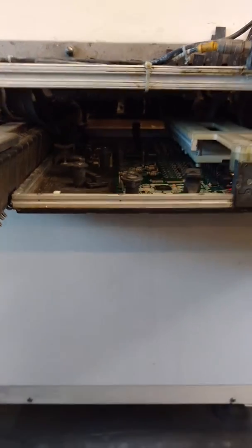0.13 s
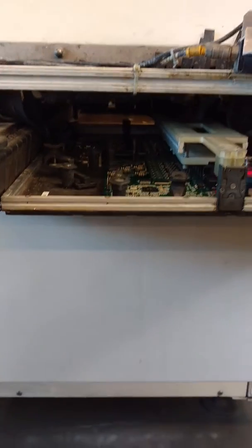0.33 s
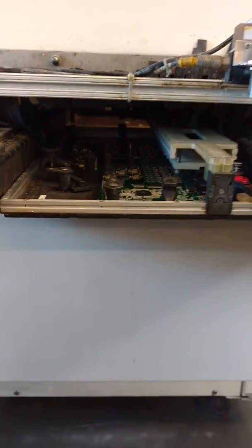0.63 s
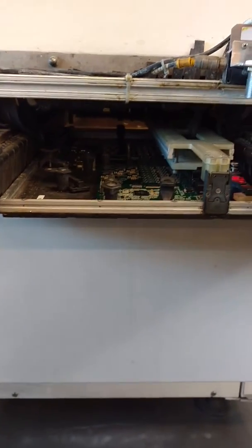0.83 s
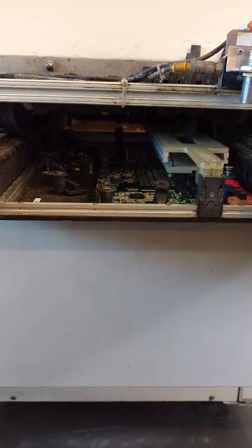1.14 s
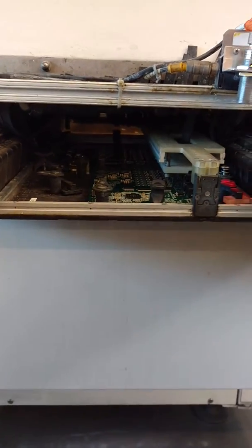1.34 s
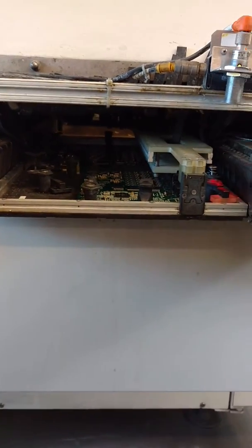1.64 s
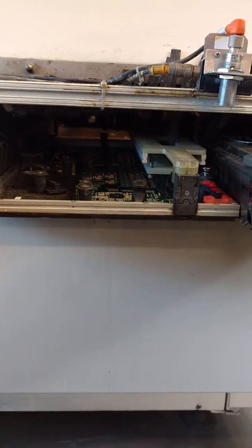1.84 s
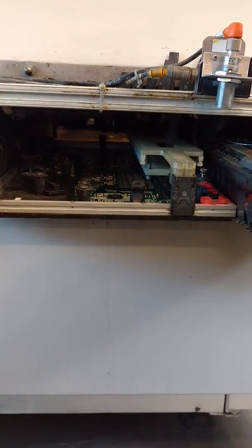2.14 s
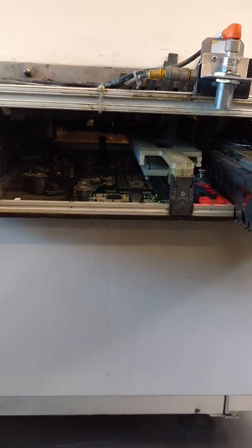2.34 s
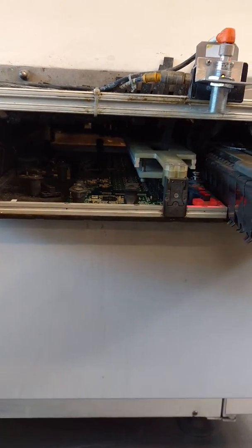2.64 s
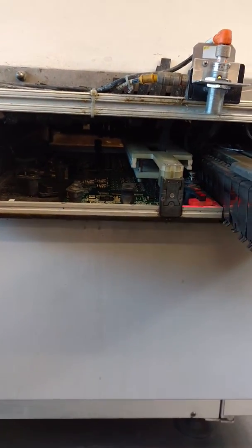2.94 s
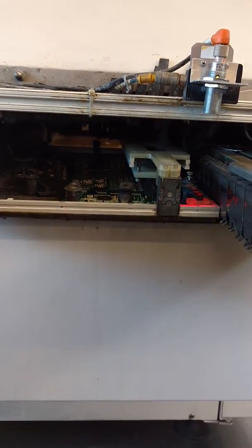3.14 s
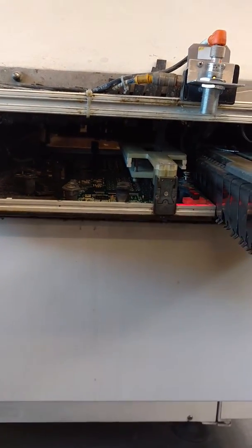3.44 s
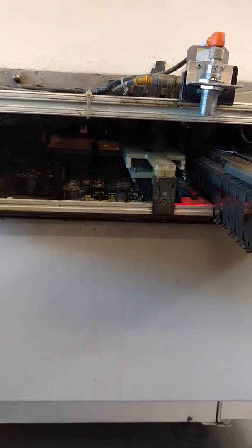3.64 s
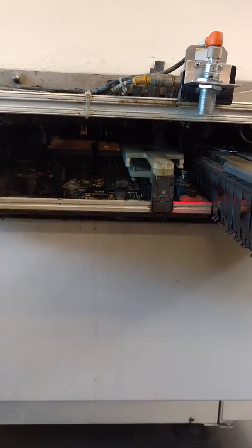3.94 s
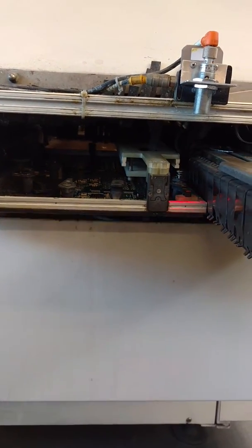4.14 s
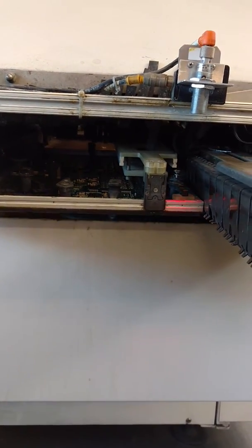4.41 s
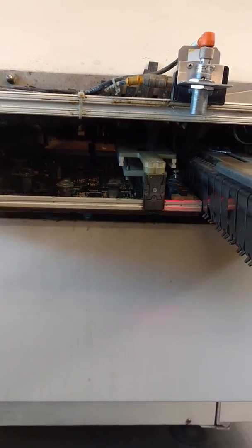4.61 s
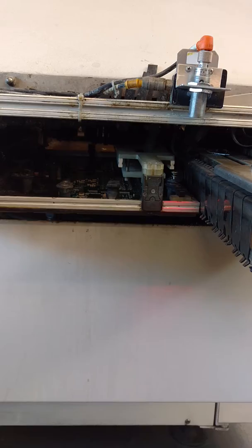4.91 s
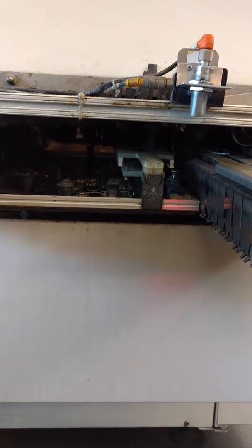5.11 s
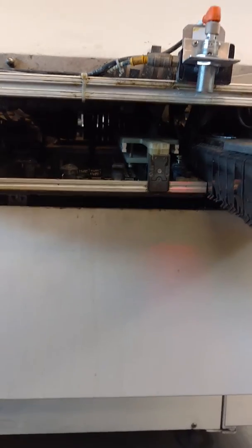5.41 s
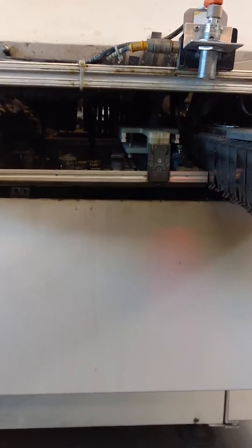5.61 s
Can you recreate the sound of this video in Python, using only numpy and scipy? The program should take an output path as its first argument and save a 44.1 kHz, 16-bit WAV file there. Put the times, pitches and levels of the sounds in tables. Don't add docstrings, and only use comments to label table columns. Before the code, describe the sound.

A soldering machine runs indoors, heard close on a handheld stereo microphone with a slightly hollow, phasey colour. Fans, ducts, pump and motors make a thick, steady hum and roar, with a thin inverter whine on top. At 0.56 s a valve ticks and a cylinder hits with a rapid bouncing metallic clunk; a bright air jet hisses until 2.1 s while the carriage rumbles away with tiny squeaks, and the hum ducks under it. The hiss stops abruptly. A short rising chirp at 2.25 s leads into a winding servo whine and rolling return until 2.9 s, with dry ticks around 2.36, 2.47 and 2.62 s. The hum creeps back, with a small bump at 3.15 s. At 4.0 s a lower, longer, rattling clunk starts a slightly softer spray; rail joints jolt and sing at 4.26 and 4.55 s, another jolts at 5.23 s. It shuts at 5.48 s, followed by a chirp at 5.65 s and a final tick at 5.76 s.

```python
import sys
import numpy as np
from scipy import signal
from scipy.fft import rfft, irfft, next_fast_len
from scipy.io import wavfile
from scipy.ndimage import uniform_filter1d

SR = 44100
rng = np.random.default_rng(int(sys.argv[2]) if len(sys.argv) > 2 else 0)


def ratio_of_db(decibels):
    return 10 ** (np.asarray(decibels, float) / 20)


def to_wav(sig):
    pcm = np.clip(np.atleast_2d(sig), -1, 1) * 32767
    pcm = np.round(pcm).astype(np.int16)
    wavfile.write(sys.argv[1], SR, pcm.T)


N = 254456

# (pitch_hz, lag_rad)
PORT_LAG = [(40, 0.18), (120, 0.19), (250, 0.098), (400, -0.31), (1200, -0.39), (3000, 0.9)]
# (pitch_hz, angle_rad)
PORT_APART = [(60, -0.4), (130, 0.2), (250, 0.08), (480, -0.72), (640, 1.1), (1100, 0.8), (1500, 1.3),
              (2200, 2.5), (3000, 1.37), (6000, 2), (15000, 1.38)]
# (pitch_hz, level_db)
PORT_NEAR = [(30, .5), (70, -4.5), (160, 4), (400, 2), (1000, 3), (2200, 5.5), (3000, -4), (4400, -0.5),
             (5800, -5.5), (7000, 6), (15000, -6)]
# (valve_opens_s, carriage_stops_s, valve_shuts_s, jet_level_db, gain_duck_db)
CYCLES = [
    (0.56, 1.88, 2.087, -42.5, -10.5),
    (3.986, 5.326, 5.48, -43.5, -11.5),
]
# (time_s, half_length_s, hall_lift_db, rumble_level_db, slide_whine_db)
JOLTS = [
    (1.413, .08, 2, -52, -60),
    (1.83, 0.048, 1.5, -53, -60),
    (3.153, .1, 1, -43, -60),
    (4.264, 0.067, 3, -38, -43),
    (4.553, .05, 1.5, -39, -46),
    (5.233, 0.084, 2, -44, -47),
]
HALL_DB = -23.5


def evened(x):
    return x / np.sqrt(np.mean(x ** 2) + 1e-20)


def read(points, hz):
    f, value = np.transpose(points)
    return np.interp(np.log(hz + 1), np.log(f + 1), value)


def add(mix, s, sound):
    part = mix[:, round(s * SR):][:, :sound.shape[1]]
    part += sound[:, :part.shape[1]]


def window(start, end, ramp):
    t = np.arange(N) / SR
    return np.clip(np.minimum(t - start, end - t) / ramp, 0, 1)


def bump(s, half):
    return np.exp(-((np.arange(N) / SR - s) / half) ** 2)


def whistle(hz, width, size, steady=0.):
    hop = 16
    r, steps = np.exp(-np.pi * width * hop / SR), size // hop + 2
    a, b = rng.standard_normal((2, 2, steps + 600))
    drift = signal.lfilter([1], np.convolve([1, -r], [1, -r]), a + 1j * b)[:, 600:]
    drift /= np.sqrt(np.mean(abs(drift) ** 2))
    mid_hz = np.mean(hz)
    apart = read(PORT_APART, mid_hz)
    first = drift[0] + steady
    second = np.cos(apart) * first * np.exp(-1j * read(PORT_LAG, mid_hz))
    second = second + np.sin(apart) * (drift[1] + 1j * steady)
    second = second / ratio_of_db(read(PORT_NEAR, mid_hz))
    pair = [np.interp(np.arange(size) / hop, np.arange(steps), v) for v in (first, second)]
    carrier = np.exp(2j * np.pi * np.cumsum(hz * np.ones(size)) / SR)
    return evened((pair * carrier).real)


def noise(spectrum, patchy_db, flicker_db, near_db):
    frames, hz = N // 256 + 5, np.fft.rfftfreq(1024, 1 / SR)
    a, b, c, d, patches = rng.standard_normal((frames, 513, 5)).T
    patches = evened(uniform_filter1d(uniform_filter1d(patches, size=10, axis=0), size=10, axis=1))
    flicker = evened(uniform_filter1d(rng.standard_normal(frames), size=5))
    apart = read(PORT_APART, hz)[:, None]
    first = a + 1j * b
    second = np.cos(apart) * first * np.exp(-1j * read(PORT_LAG, hz))[:, None]
    second = second + np.sin(apart) * (c + 1j * d)
    second = second / ratio_of_db(read(PORT_NEAR, hz) + near_db * hz / 10000)[:, None]
    z = np.array([first, second])
    z *= ratio_of_db(read(spectrum, hz)[:, None] + patchy_db * patches + flicker_db * flicker)
    return evened(signal.istft(z, nperseg=1024, noverlap=768)[1][:, :N])


def hall_level_db():
    duck_wait_s, duck_s, recover_wait_s, recover_s = 0.018, 0.035, .05, 0.51
    travel_db, stop_s = 3.5, 0.039
    t, db = np.arange(N) / SR, np.full(N, HALL_DB)
    for opens, stops, shuts, _, duck_db in CYCLES:
        fall = 1 - np.exp(-np.maximum(t - opens - duck_wait_s, 0) / duck_s)
        db = db + duck_db * fall * np.exp(-np.maximum(t - shuts - recover_wait_s, 0) / recover_s)
        db = db + travel_db * window(opens + duck_wait_s, stops + stop_s / 2, stop_s)
    return db + sum(lift_db * bump(s, half) for s, half, lift_db, _, _ in JOLTS)


def hall():
    # (pitch_hz, level_db per Hz)
    roar = [(30, -36), (48, -36), (68, -33), (100, 1.5), (160, 1), (250, -3.5), (400, 1.5), (600, -10),
            (900, -10.5), (1400, -11.5), (2200, -12.5), (3500, -23), (6000, -26.5), (9400, -39.5),
            (10600, -42), (13000, -56), (15500, -52)]
    # (pitch_hz, width_hz, level_db)
    ducts = [(254, 22, -15), (351, 25, -13), (393, 15, -9), (501, 13, -7.5), (600, 30, -19), (790, 30, -19),
             (834, 18, -20), (1083, 28, -18), (1266, 38, -17), (1580, 40, -22), (1709, 25, -21),
             (1994, 25, -24)]
    # (pitch_hz, level_db against the hall)
    motors = [(1350, -11.5), (1377, -16), (3815, -29), (3946, -25), (5650, -40)]
    # (pitch_hz, level_db)
    inverter = [(7500, -50), (9916, -38), (10034, -32), (10150, -43), (12516, -55)]
    t = np.arange(N) / SR
    out = ratio_of_db(1.5) * noise(roar, patchy_db=0.63, flicker_db=0.55, near_db=3.0)
    for hz, width, db in ducts:
        out += ratio_of_db(db) * whistle(hz, width, N)
    for hz, db in motors:
        sway = 0.001003 * np.sin(2 * np.pi * (0.44 * t + rng.random()))
        sag = 1 - .0015 * (t - 2.9) + sway
        out += ratio_of_db(db) * whistle(hz * sag, 4.0 + hz / 500, N, steady=1.3 * min(1, 2000 / hz))
    home_s, busy_db = .69, -10
    busy = sum(window(opens, shuts + home_s, .03) for opens, _, shuts, _, _ in CYCLES)
    for hz, db in inverter:
        out += ratio_of_db(db + .5 + busy_db * busy) * whistle(hz, 28, N, steady=1.6)
    return out * ratio_of_db(hall_level_db())


def carriage():
    # (pitch_hz, level_db)
    rumble_spectrum = [(300, -43), (700, -20.5), (1600, 1), (3000, -3.5), (4700, -15), (7000, -12),
                       (10000, -25), (16000, -35.5)]
    # (start_s, end_s, from_db, to_db)
    moves = [
        (.6, 1.777, -34.5, -42.5),
        (2.206, 2.793, -43.5, -31),
        (4.03, 5.247, -40.5, -39.5),
        (5.55, 5.9, -49, -35),
    ]
    idle_db, ramp_s = -48.5, 0.088
    rumble = noise(rumble_spectrum, patchy_db=2.5, flicker_db=1.2, near_db=.6)
    t = np.arange(N) / SR
    level = ratio_of_db(idle_db + hall_level_db() - HALL_DB)
    for start, end, from_db, to_db in moves:
        level = level + ratio_of_db(np.interp(t, [start, end], [from_db, to_db])) * window(start, end, ramp_s)
    return rumble * (level + sum(ratio_of_db(db) * bump(s, half) for s, half, _, db, _ in JOLTS))


def servo():
    # (start_s, end_s, pitch_hz, level_db, blur_hz)
    cruise = (2.495, 2.755, 5400, -38.5, 6)
    # (start_s, end_s, pitch_ratio_reached, lines of (pitch_hz, level_db, blur_hz))
    stages = [
        (2.187, 2.4, 1.005, [(3590, -47, 50), (5590, -50.5, 80)]),
        (2.375, 2.51, 1.17, [(4350, -47, 110)]),
        (2.495, 2.755, 1., [(4660, -43, 170), (3300, -44.5, 150), (1600, -37, 90), (6010, -51, 120)]),
        (2.75, 2.9, 1., [(5650, -52, 60)]),
    ]
    # (start_s, level_db)
    chirps = [
        (2.255, -40.5),
        (5.655, -42),
    ]
    # (start_s, length_s, pitch_hz, level_db)
    squeaks = [
        (.725, .013, 7000, -39),
        (.74, .011, 8200, -35),
        (.748, .019, 7130, -36),
        (2.147, .015, 6800, -47),
        (2.16, .024, 9700, -45),
        (2.178, .023, 8600, -48),
        (2.204, 0.0302, 9300, -45),
        (2.53, .02, 7600, -50),
        (4.16, .04, 8000, -50),
    ]
    chirp_s, chirp_from_hz, chirp_to_hz, chirp_blur_hz = .072, 3450, 6600, 430
    squeak_rise_hz_per_s, squeak_blur_hz = 8000, 260
    slide_hz, slide_blur_hz = 4750, 220
    start, end, hz, db, blur_hz = cruise
    whines = [(start, end, hz, hz, db, blur_hz)]
    for start, end, ratio, lines in stages:
        whines += [(start, end, f, f * ratio, d, blur) for f, d, blur in lines]
    for s, d in chirps:
        whines.append((s, s + chirp_s, chirp_from_hz, chirp_to_hz, d, chirp_blur_hz))
    for s, length, f, d in squeaks:
        whines.append((s, s + length, f, f + length * squeak_rise_hz_per_s, d, squeak_blur_hz))
    for s, half, _, _, d in JOLTS:
        whines.append((s - half, s + half, slide_hz, slide_hz, d, slide_blur_hz))
    out = np.zeros((2, N))
    for start, end, from_hz, to_hz, db, blur_hz in whines:
        size = round((end - start) * SR)
        tone = whistle(np.linspace(from_hz, to_hz, size), blur_hz, size, steady=16 / blur_hz)
        add(out, start, ratio_of_db(db) * tone * signal.windows.tukey(size, .2))
    return out


def knocks():
    # (time_s, level_db, pitch_factor)
    clunks = [
        (.583, -16.5, 1.18),
        (0.589, -18.5, 1.01),
        (0.603, -20, 1),
        (0.622, -31, 1.35),
        (4.003, -17.5, 0.75),
        (4.014, -19.5, 1),
        (4.022, -20.5, 1.04),
        (4.036, -21.5, .97),
        (4.05, -23.5, 1.06),
    ]
    # (pitch_hz, level_db, t60_s)
    frame = [(638, 12.5, 0.048), (1094, 7.5, 0.059), (1422, 0.5, 0.12), (1714, -2.5, 0.1), (2050, 4, 0.032),
             (2944, 3, 0.04), (4460, -6.5, 0.096), (6350, -4, 0.055)]
    # (time_s, level_db, lowest_hz, length_s)
    ticks = [
        (0.566, -38, 5000, .008),
        (2.148, -49, 6000, .008),
        (2.36, -33, 3000, 0.0069),
        (2.47, -37, 5000, .006),
        (2.476, -34, 5000, .008),
        (2.622, -37, 1500, .012),
        (3.99, -39, 5000, .01),
        (5.736, -45, 7000, .006),
        (5.761, -33.5, 5000, .01),
    ]
    rise_s = .0025
    out, t = np.zeros((2, N)), np.arange(6000) / SR
    for s, db, pitch in clunks:
        ring = 0
        for f, d, t60 in frame:
            turns = f * pitch * t + rng.random((2, 1)) * 0.37
            ring = ring + ratio_of_db(d - 60 * t / t60) * np.sin(2 * np.pi * turns)
        crack = signal.lfilter([1], [1, -.6], rng.standard_normal((2, len(t)))) * ratio_of_db(-60 * t / 0.098)
        add(out, s, ratio_of_db(db) * (0.51 * ring + 0.41 * crack) * (1 - np.exp(-t / rise_s)))
    for s, db, low_hz, length in ticks:
        band = signal.butter(1, [low_hz, 11000], "band", fs=SR, output="sos")
        puff = signal.sosfilt(band, rng.standard_normal((2, len(t))))
        add(out, s, ratio_of_db(db) * puff * (np.exp(-t / length) + 0.12 * np.exp(-t / .04)))
    return out


def spray():
    # (pitch_hz, level_db)
    jet_spectrum = [(600, -42), (1500, -13), (2500, -3.5), (4000, -4), (6000, 0), (8000, 0), (11000, -5),
                    (15000, -14)]
    # (time_s, level_db, decay_s)
    puffs = [
        (.563, -39, 0.011),
        (3.986, -44, .02),
        (4.008, -33, .008),
    ]
    build_db, build_s, shut_db_per_s = -5, 0.11, -260
    jet = noise(jet_spectrum, patchy_db=2.0, flicker_db=0.23, near_db=-2.5)
    t, level = np.arange(N) / SR, 0
    for opens, _, shuts, db, _ in CYCLES:
        pressure_db = build_db * np.exp(-np.maximum(t - opens, 0) / build_s)
        shut_db = shut_db_per_s * np.maximum(t - shuts, 0)
        level = level + ratio_of_db(db + pressure_db + shut_db) * (t > opens)
    for s, db, decay in puffs:
        level = level + ratio_of_db(db) * np.exp(-np.maximum(t - s, 0) / decay) * (t > s)
    return jet * ratio_of_db(8.5) * level


def steer(ports, lean):
    comb_hz, edge_hz = 2625, 15600
    size = next_fast_len(N + 64)
    z, hz = rfft(ports, size), np.fft.rfftfreq(size, 1 / SR)
    sides = (z - 1.143 * np.exp(-2j * np.pi * hz / comb_hz) * z[::-1]) / np.sqrt(2)
    tilt = ratio_of_db(np.outer([.5, -.5], read(lean, hz)))
    return irfft(sides * tilt * (hz < edge_hz), size)[:, :N]


def starve(x, margin_db, pull):
    hz, t, z = signal.stft(np.array([x[0] + x[1], x[0] - x[1]]) / 2, SR, nperseg=1024)
    power = abs(z) ** 2 + 1e-16
    bright = power[:, hz > 8000].sum((0, 1)) / power.sum((0, 1))
    bright_db = 10 * np.log10(uniform_filter1d(bright, size=9))
    band_db = 10 * np.log10(uniform_filter1d(uniform_filter1d(power, size=7, axis=1), size=5, axis=2))
    weak = band_db[::-1] - band_db > margin_db - pull * bright_db
    dropped = weak & ((hz > 2000) & (hz < 14000))[:, None]
    mid, side = signal.istft(z * ~dropped, SR, nperseg=1024)[1][:, :N]
    return np.array([mid + side, mid - side])


def scene():
    # (pitch_hz, level_db)
    hall_lean = [(300, 0.5), (1300, 0), (2500, -3), (3200, -0.5), (4400, -1), (5250, 3.5), (6100, 1),
                 (7800, 4), (10500, -1.5), (15000, 4)]
    # (pitch_hz, level_db)
    jet_lean = [(1300, -9), (2600, 0.5), (3000, 8), (4200, -9), (5200, 3), (7800, 4), (10500, 3.5),
                (13000, 3), (15000, 1.5)]
    return steer(hall() + carriage() + servo() + knocks(), hall_lean) + steer(spray(), jet_lean)


def band_limit(x):
    return signal.sosfilt(signal.butter(12, 16120, fs=SR, output="sos"), x)


def record(dry):
    mix = starve(dry, margin_db=1.5, pull=1.0)
    return band_limit(mix)


dry = scene()
out = record(dry)
to_wav(out)
```